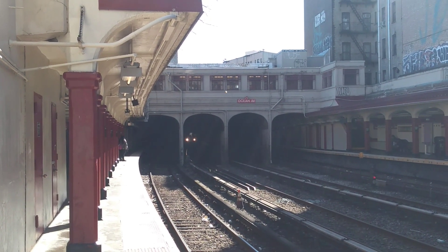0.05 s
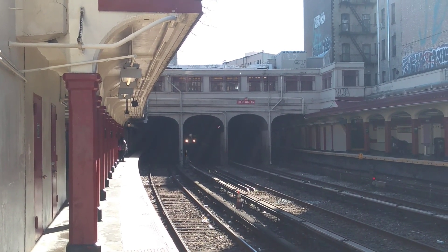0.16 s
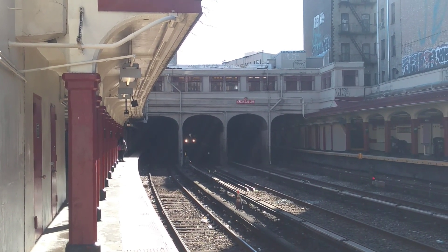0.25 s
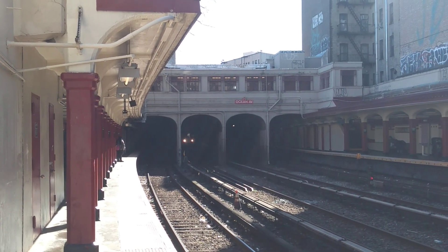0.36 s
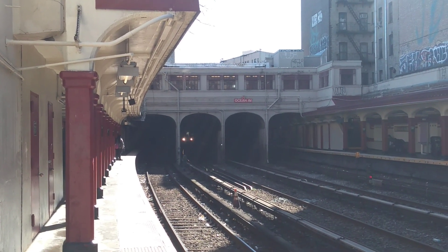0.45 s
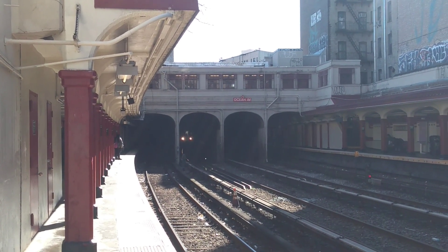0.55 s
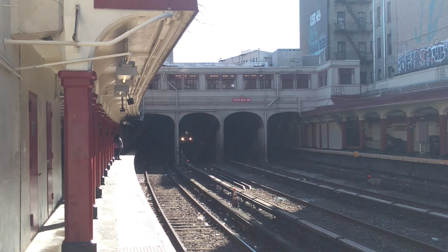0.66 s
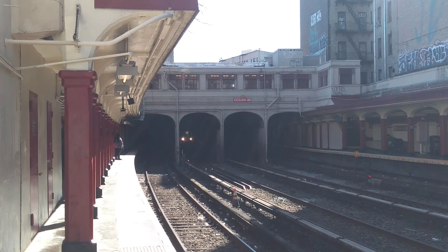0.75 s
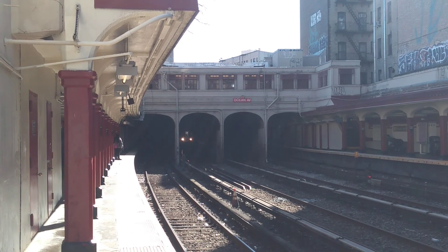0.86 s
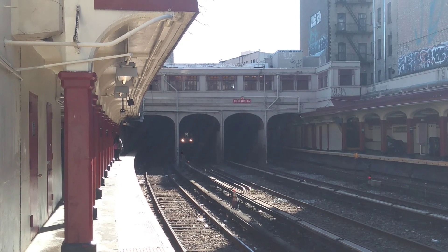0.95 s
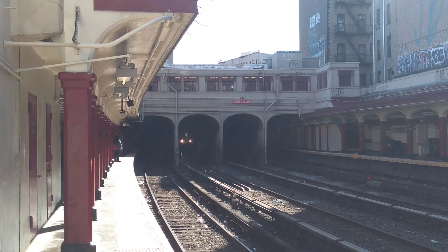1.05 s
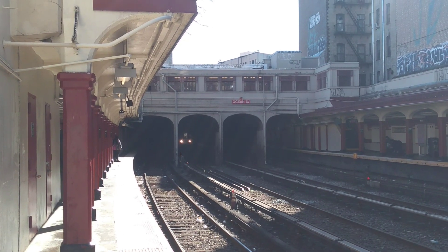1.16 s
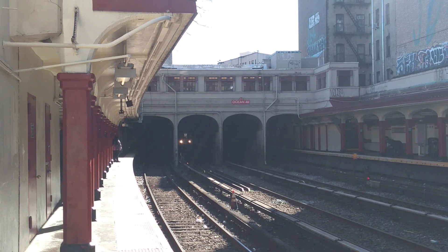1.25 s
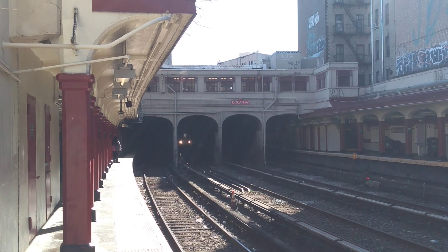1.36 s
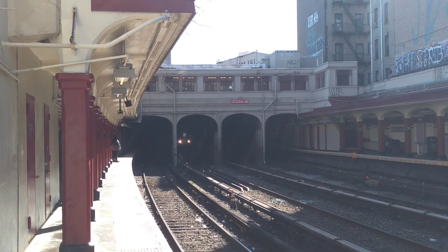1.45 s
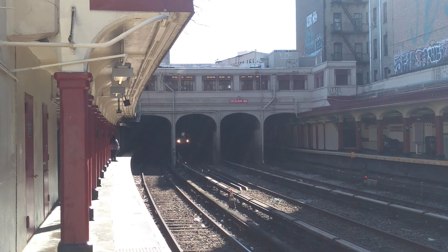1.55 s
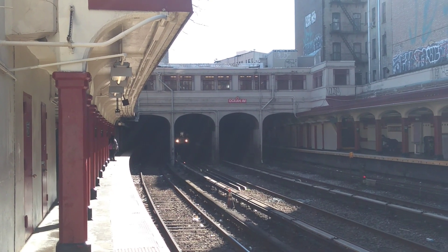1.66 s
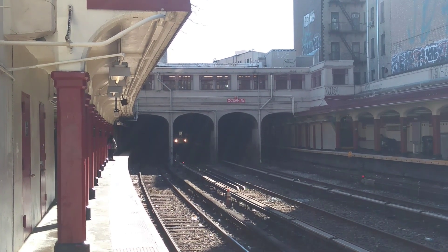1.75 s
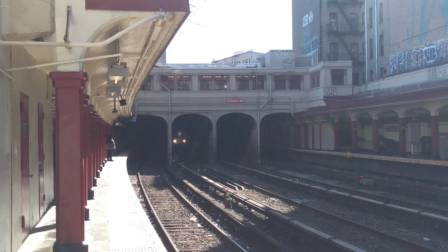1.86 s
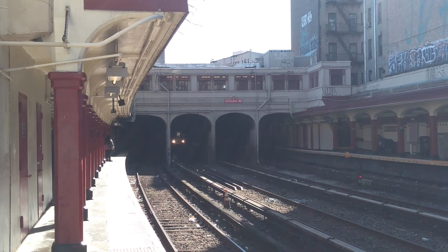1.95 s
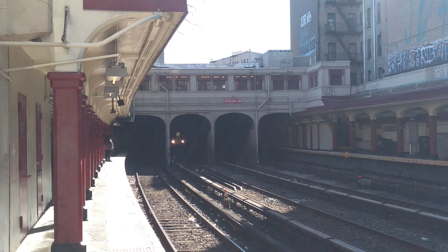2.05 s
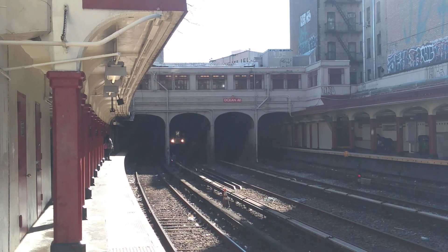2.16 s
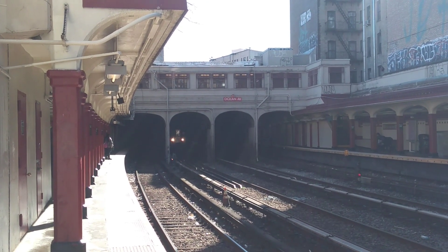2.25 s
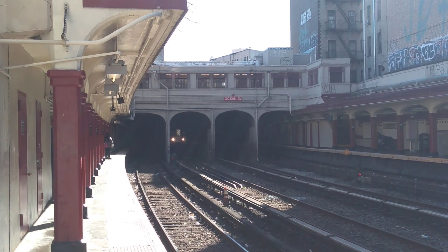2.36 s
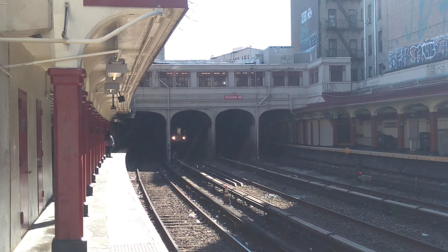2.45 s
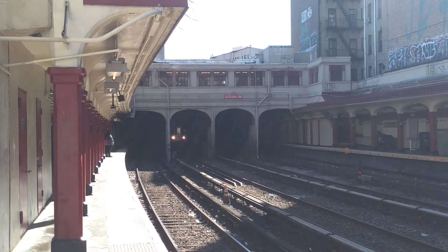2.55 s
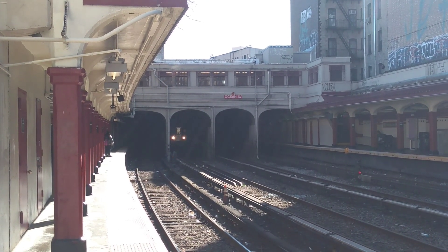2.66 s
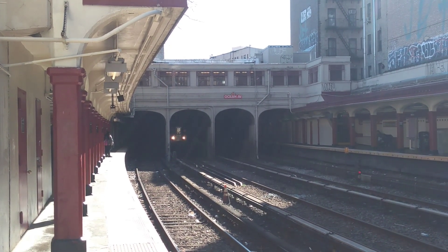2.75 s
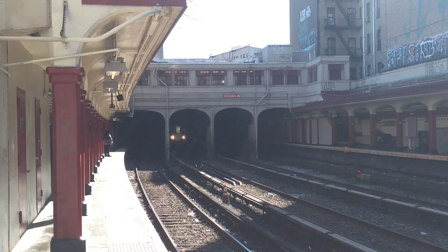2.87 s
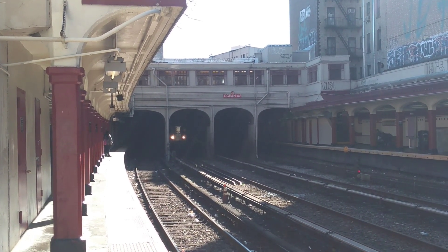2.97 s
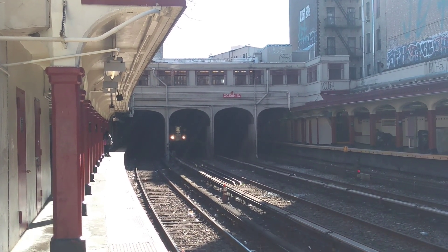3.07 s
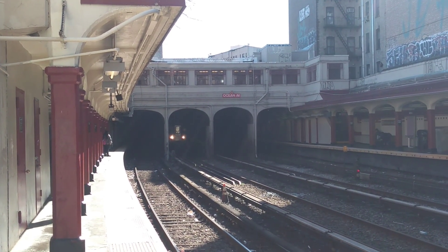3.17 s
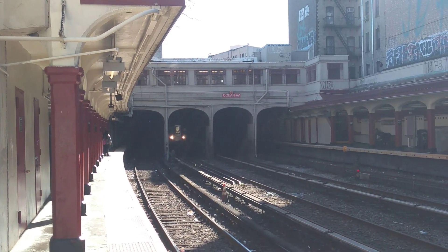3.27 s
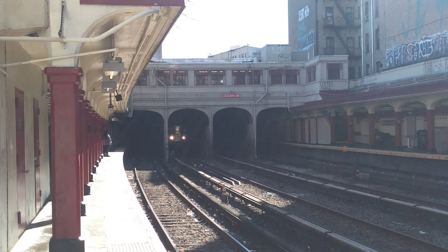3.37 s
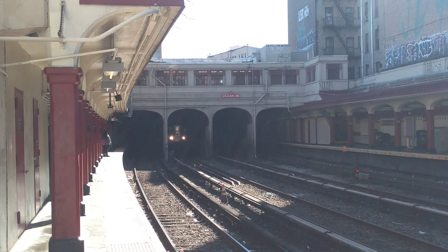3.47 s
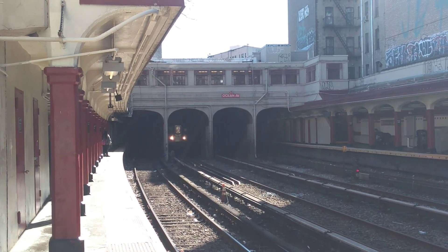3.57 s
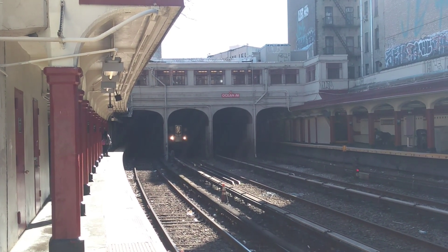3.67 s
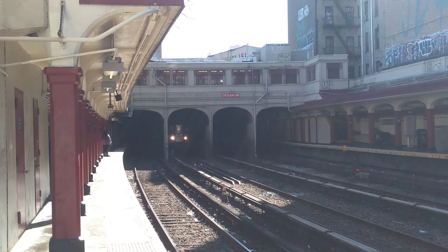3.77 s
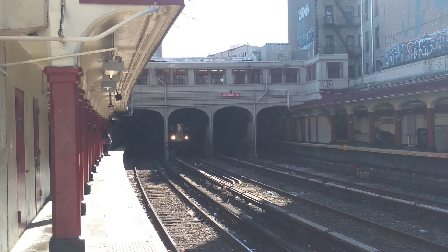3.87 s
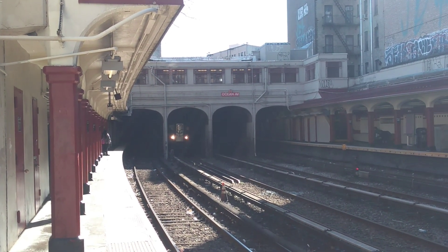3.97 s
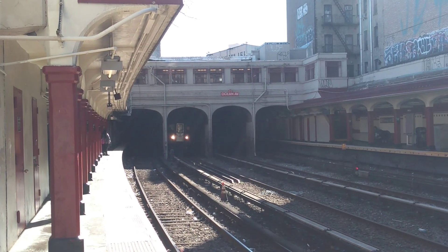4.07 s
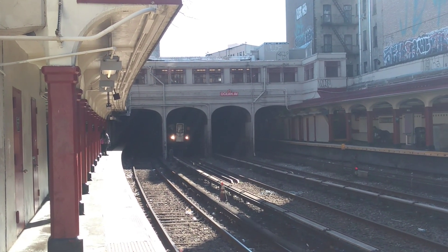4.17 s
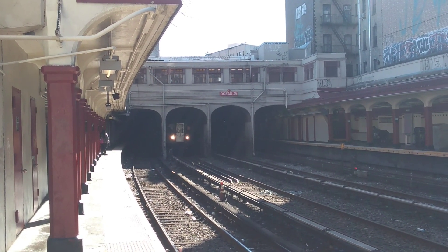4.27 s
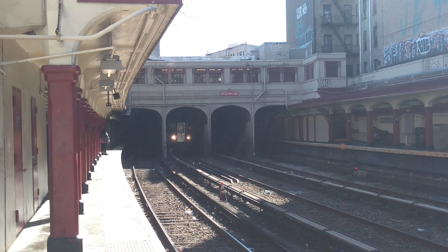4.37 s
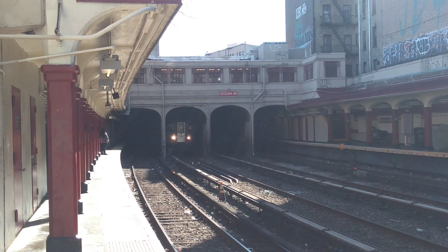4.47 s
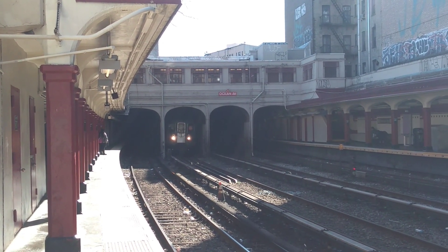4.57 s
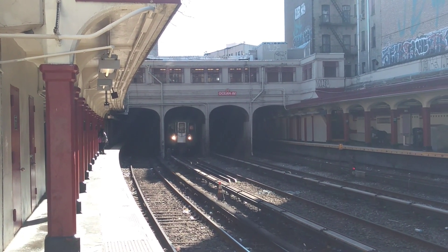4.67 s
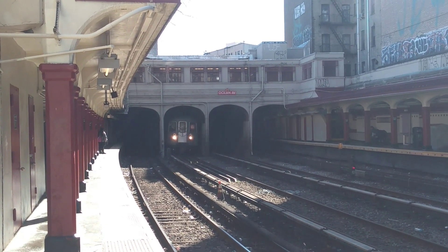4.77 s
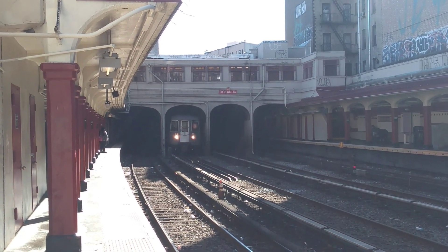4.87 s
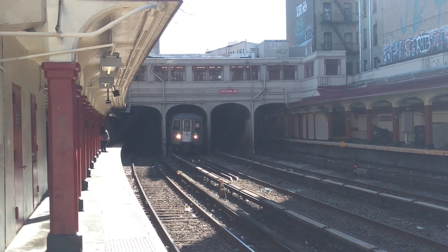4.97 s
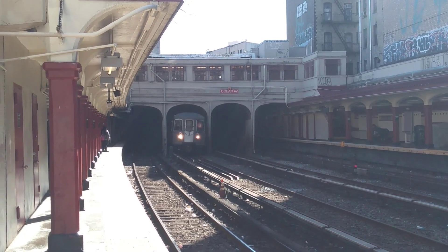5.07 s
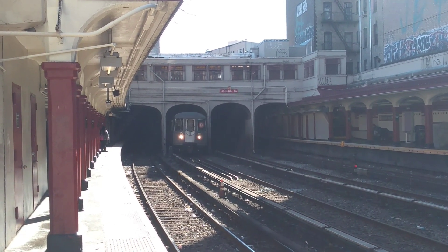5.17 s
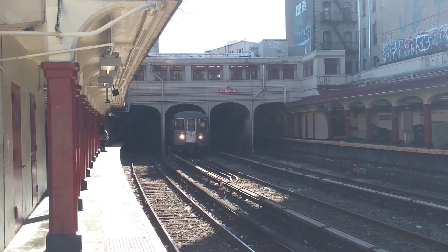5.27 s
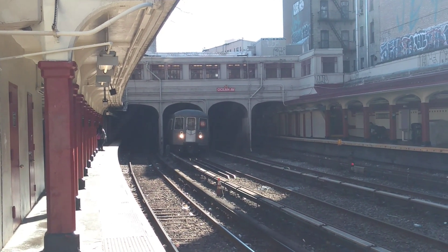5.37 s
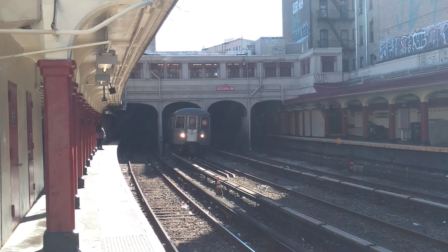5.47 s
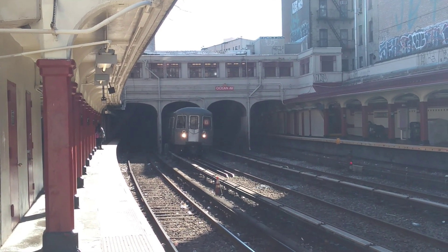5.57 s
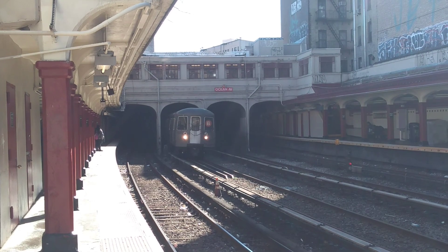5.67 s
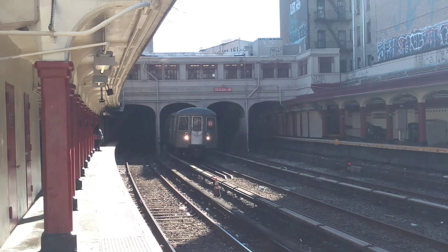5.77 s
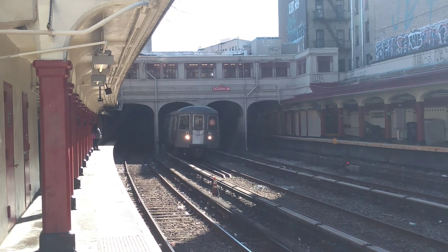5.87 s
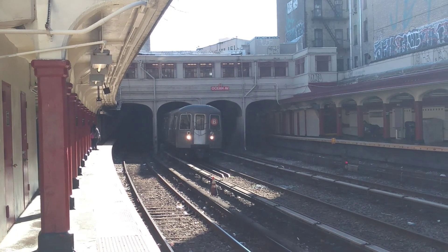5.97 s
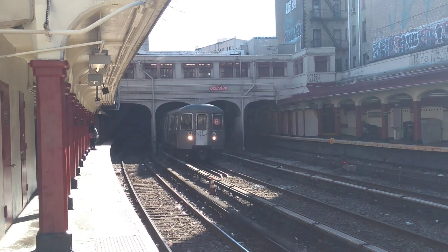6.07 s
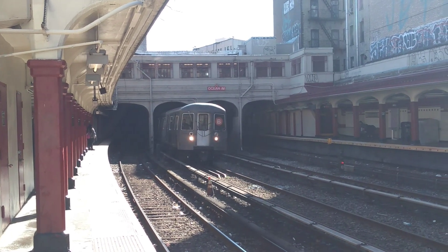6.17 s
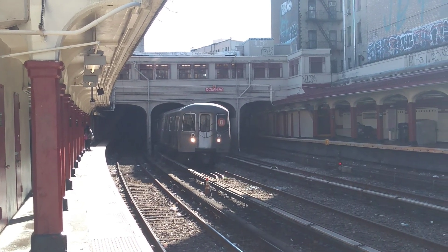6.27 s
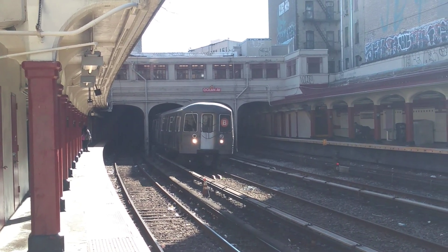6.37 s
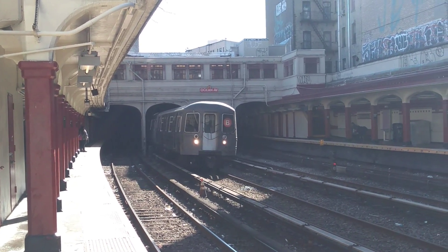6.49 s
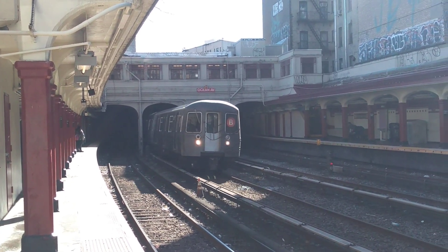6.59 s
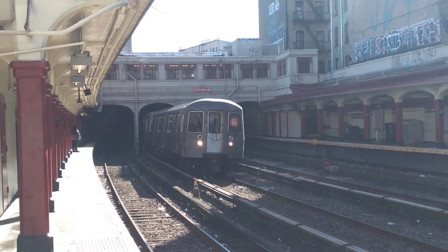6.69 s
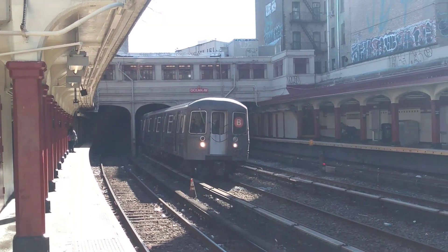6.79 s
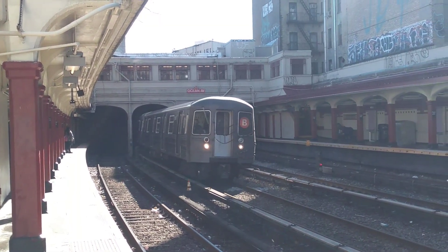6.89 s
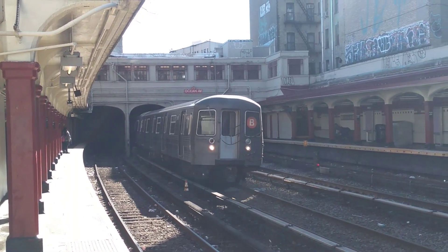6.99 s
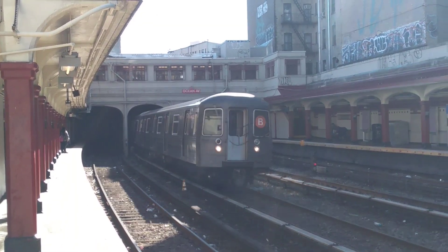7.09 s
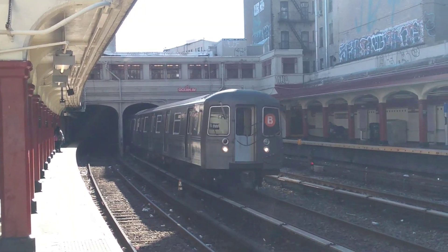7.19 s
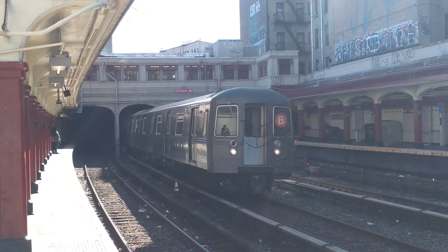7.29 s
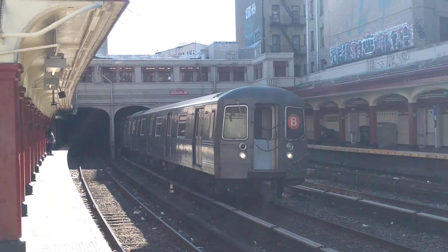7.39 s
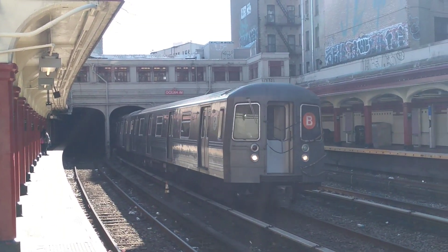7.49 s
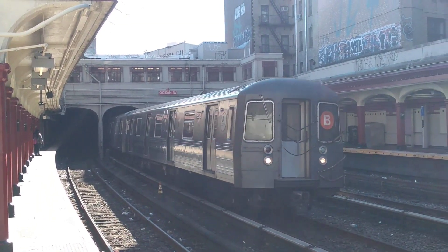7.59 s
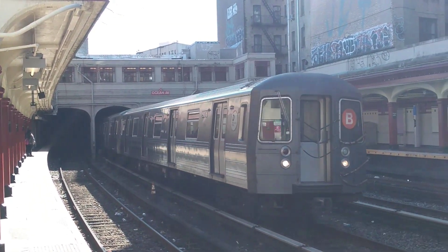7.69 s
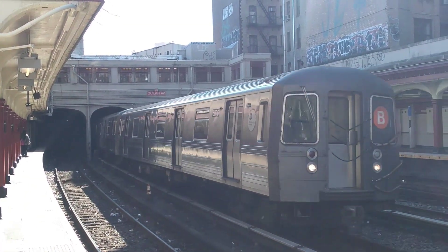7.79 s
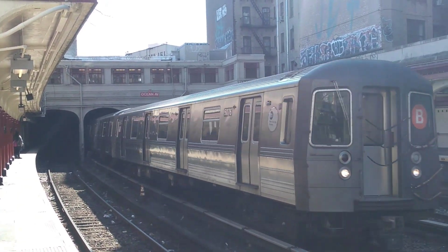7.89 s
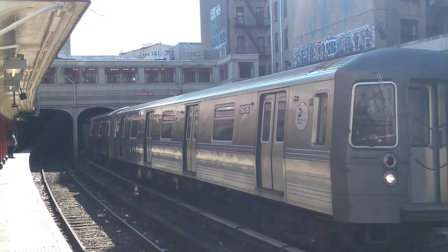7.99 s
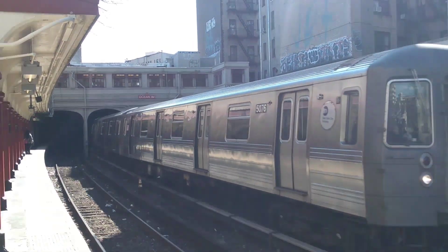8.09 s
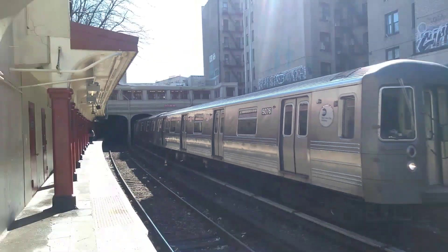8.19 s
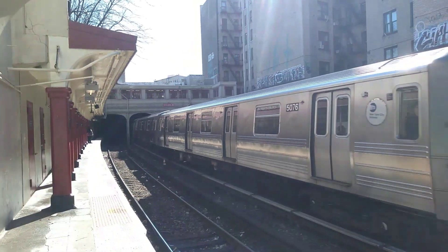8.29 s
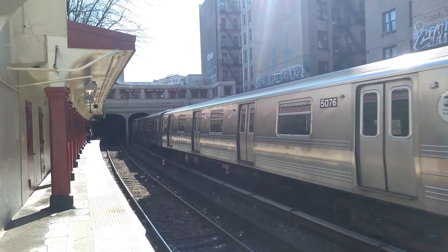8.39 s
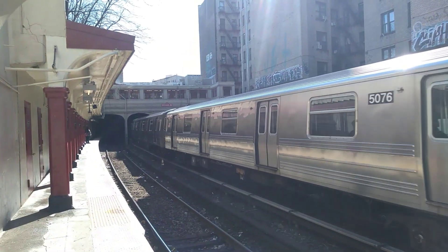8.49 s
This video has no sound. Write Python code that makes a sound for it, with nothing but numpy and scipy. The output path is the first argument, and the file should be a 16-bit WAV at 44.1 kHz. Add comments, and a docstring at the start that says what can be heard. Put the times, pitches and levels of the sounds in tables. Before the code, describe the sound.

Low wind thumps hit a handheld microphone on an open-air platform while a subway train rumbles faintly in a tunnel. The wind eases and the rumble swells unevenly, turning brighter as the train emerges. Wheels whine and ping faintly, flanges scrape, one heavy gust thumps, and the train passes close with a loud roar and hard knocks, cutting off while still rolling by.

```python
"""Wind thumps and gusts buffet the microphone at once, over the far-off rumble of a subway train in a tunnel.
The train rolls out towards an open-air platform: shaped noise grows in uneven surges as it nears,
first with the tunnel's colour, then brighter and direct. Wheels and motors sing as faint wavering tones,
knocks are short noise bursts, treads ping as fading tones, and flanges scrape as narrow hisses.
A stereo widener feeds each side into the other, turned over and late, so the bass is in opposite phase."""
import sys
import numpy as np
from scipy import signal
from scipy.fft import rfft, irfft, next_fast_len
from scipy.io import wavfile
from scipy.ndimage import uniform_filter1d, map_coordinates

SR = 44100
rng = np.random.default_rng(int(sys.argv[2]) if len(sys.argv) > 2 else 0)


def unload_wav(signal):
    """Save mono or channel-first audio to the path in sys.argv[1] as 16-bit WAV at rate SR, clipped to [-1, 1]."""
    wavfile.write(
        sys.argv[1],
        SR,
        np.round(np.clip(np.atleast_2d(signal).T, -1, 1) * 32767).astype(np.int16),
    )


N = 376613
TIME = np.arange(N) / SR  # seconds
SIZE = next_fast_len(N + 4096, real=True)  # samples, with room for the widener's delay
FREQ = np.maximum(np.arange(SIZE // 2 + 1) * SR / SIZE, 1)  # Hz

# resonances of track and wheels: pitch_hz, width_hz, tunnel_lift_db, alongside_lift_db
STEEL_RESONANCES = [(264, 104, 2, 3.5), (520, 55, 1, 2), (655, 82, 4.5, -1.5), (764.3, 136, 6.5, 5.5),
                    (993, 99, 2, 5), (1168, 145, 3, 0), (1490, 160, 3, 3.5), (1646, 65, 8, 6),
                    (2088, 280, 8, 4.5), (2805, 216, 5, 5.5), (2995, 85, 5, 5.5), (3750, 160, 2, 5),
                    (6440, 270, 2.5, 8)]
# what the second port hears and how the widener mixes: pitch_hz, own_sound_db, crossfeed_db
MICROPHONE_PORTS = [(100, -36, -1.8), (700, -35, -1.6), (1490, -16.5, -2), (3500, -5, -3),
                    (5630, -4.5, -2.5), (7400, -3.5, -6.5), (9900, -3, -19), (14000, -8, -10)]
# how the wheel roar nears: alongside_db, loss_per_doubling_db, tunnel_gain_db, deep_tunnel_loss_db
ROAR_APPROACH = (-21, 6, 2.43, 0.7)

# the train runs at a steady speed along a track to one side of the microphone
SPEED_M_PER_S, TRACK_OFFSET_M = 13.71, 8.29
ALONGSIDE_S = 8.23  # its front draws level; from then on the distance stays the same


def from_db(db):
    """Turn decibels into a gain."""
    return 10 ** (np.asarray(db) / 20)


def rms_one(x):
    """Scale a sound so that its average strength (rms) is 1."""
    return x / np.sqrt(np.mean(x ** 2) + 1e-20)


def soft_step(x):
    """Climb smoothly from 0 to 1 around x = 0."""
    return .5 + .5 * np.tanh(x / 2)


def bump(middle_s, length_s):
    """Rise and fall as a bell-shaped curve that reaches 1 in the middle."""
    return np.exp(-np.minimum(2 * ((TIME - middle_s) / length_s) ** 2, 20))


def in_frequency(rows):
    """Spread each column of a table over all frequencies, the first column being Hz."""
    hz, *columns = np.transpose(rows)
    return [np.interp(np.log(FREQ), np.log(hz), column) for column in columns]


def below(hz, order):
    """Gain of a filter that keeps what lies below hz."""
    return 1 / np.sqrt(1 + (FREQ / hz) ** (2 * order))


def above(hz, order):
    """Gain of a filter that keeps what lies above hz."""
    return 1 / np.sqrt(1 + (hz / FREQ) ** (2 * order))


def band_pass(x, low_hz, high_hz):
    """Keep one band of a sound, without ringing ahead of it."""
    return signal.sosfilt(signal.butter(2, [low_hz, high_hz], "band", fs=SR, output="sos"), x)


def drift(rate):
    """Wander smoothly at random with spread 1, through about rate new values a second."""
    knots = rng.standard_normal(2048)
    coarse_time = TIME[::32]
    curve = map_coordinates(knots, [coarse_time * rate], order=3, mode="wrap")
    return rms_one(np.interp(TIME, coarse_time, curve))


def noise(colour):
    """Make coloured noise of rms 1: separate noise at each port, the second heard mainly in the treble."""
    own_db, _ = in_frequency(MICROPHONE_PORTS)
    white = rng.standard_normal((2, len(FREQ))) + 1j * rng.standard_normal((2, len(FREQ)))
    ports = np.array([np.ones(len(FREQ)), from_db(own_db)])
    shares = ports / np.hypot(*ports)
    return rms_one(irfft(white * colour * shares, SIZE)[:, :N])


def thumps(peak_cycles=0.92, width_cycles=0.58, lead_cycles=0.22, lead_s=0.0022,
           crack_low_hz=180, crack_high_hz=520, dull_hz=720):
    """A single eddy is one firm swing of pressure, quick at first, with a dull crack at its front."""
    # single eddies that thump the microphone: start_s, swing_db, pitch_hz, crack_db (before dulling)
    eddies = [(0.026, -8.5, 121, -24.5), (0.058, -12, 100, -21), (0.084, -14, 101, -15),
              (0.3238, -4.5, 89, -14.5), (.661, -24, 94, -38), (0.899, -21, 131, -25),
              (1.155, -18, 105, -29), (1.176, -11.5, 94, -22), (1.392, -13, 115, -24),
              (1.412, -17, 105, -28), (1.434, -17, 111, -30), (1.465, -14, 102, -32), (1.71, -18, 85, -30),
              (2.128, -16.5, 112, -18), (6.670, 0.5, 107, -26), (6.714, -19, 100, -36),
              (6.748, -9, 97, -38)]
    out = np.zeros(N + SR)
    age = TIME[:SR // 10]
    crack = band_pass(signal.unit_impulse(len(age)), crack_low_hz, crack_high_hz)
    crack = crack / np.abs(crack).max()
    for start_s, swing_db, hz, crack_db in eddies:
        cycles = hz * age + lead_cycles * (1 - np.exp(-age / lead_s))
        envelope = np.exp(-((hz * age - peak_cycles) / width_cycles) ** 2)
        swing = np.sin(2 * np.pi * cycles) * envelope
        i = round(start_s * SR)
        out[i:i + len(age)] += from_db(swing_db) * swing + from_db(crack_db) * crack
    return signal.sosfilt(signal.butter(4, dull_hz, fs=SR, output="sos"), out[:N] + 1e-18)


def gusts(low_hz=62, high_hz=152, rustle_db=-28, rustle_hz=600, buffet_db=4, buffet_per_s=14):
    """Gusts and a light breeze churn at the first port: a lumpy rumble with a faint rustle on top."""
    # gusts on the microphone: middle_s, length_s, level_db (the middle is 3 dB stronger)
    gust_table = [(0.06, 0.045, -25), (0.35, 0.028, -33), (0.67, 0.022, -28), (0.915, 0.048, -39),
                  (1.195, 0.053, -31), (1.43, 0.066, -28), (1.718, 0.14, -34.5), (2.168, 0.097, -32),
                  (6.03, 0.24, -31.5), (6.36, 0.23, -27), (6.727, 0.072, -22), (7.657, 0.035, -21),
                  (8.25, 0.094, -20.5)]
    breeze_level_db, breeze_drops_s, breeze_fade_s = -37, 1.8, 0.2
    rumble = below(high_hz, order=3)
    rustle = from_db(rustle_db) * below(rustle_hz, order=3)
    churn = noise(above(low_hz, order=3) * (rumble + rustle))[0]
    churn = churn / np.sqrt(uniform_filter1d(churn ** 2, size=1000) + 1e-9)  # even out its strength
    breeze = from_db(breeze_level_db + buffet_db * drift(buffet_per_s))
    breeze = breeze * soft_step((breeze_drops_s - TIME) / breeze_fade_s)
    blows = sum(from_db(level_db) * np.sqrt(2) * bump(middle_s, length_s)
                for middle_s, length_s, level_db in gust_table)
    return churn * (breeze + blows)


def track_to_go():
    """Metres of track between the train's front and the point beside the microphone."""
    return SPEED_M_PER_S * np.maximum(ALONGSIDE_S - TIME, 0)


def approach_db(part):
    """Level of one part of the train: distance weakens it, and the tunnel favours rumble over treble."""
    mouth_m, mouth_blur_m = 47.3, 4.6  # how far off it leaves the tunnel, and how gradually
    deep_m, deep_blur_m = 90, 4.2  # beyond this the tunnel muffles it
    alongside_db, doubling_db, tunnel_db, deep_db = part
    ahead = track_to_go()
    doublings = np.log2(np.hypot(1, ahead / TRACK_OFFSET_M))
    inside = soft_step((ahead - mouth_m) / mouth_blur_m)
    deep = soft_step((ahead - deep_m) / deep_blur_m)
    return alongside_db - doubling_db * doublings + tunnel_db * inside - deep_db * deep


def surges():
    """Each part of the noise swells and lulls unevenly as the train nears (dB)."""
    # swells and lulls: middle_s, length_s, rumble_db, roar_db, ring_db, hiss_db
    surge_table = [(.2, .3, -2, -1, -1.5, 1), (.75, 0.36, 1, -0.5, -1.2, -1.5),
                   (1.234, 0.074, 1, 1, 1.6, 0), (1.45, 0.081, -2, 0.5, 2.5, 2.8),
                   (1.757, 0.079, 2, 2, 0, 1.5), (2.04, 0.068, -3, 0, -2, -2.5),
                   (2.147, 0.064, 0.5, 2, 1, 1), (2.28, .08, 0.5, -1.5, -3, 0), (2.394, 0.23, 0, 2, -1, 0),
                   (3.6, 0.39, 2.5, -0.1, -0.3, 0.5), (4.207, 0.13, .5, 0.2, 1, 0),
                   (4.442, 0.055, -3.5, 0, 1, 1), (4.6, 0.086, -1, 1.5, 1.5, .5),
                   (4.746, .12, 2, -1, -1, -1), (5.18, 0.21, 2, 0.5, -0.8, -1.7),
                   (5.58, 0.39, 1.3, 0.9, 1.1, 1.5), (5.92, 0.14, 1.2, 1, 2, 2),
                   (6.087, 0.096, 3, -0.5, 2.5, 0), (6.223, 0.091, -0.5, 0.7, -0.7, 0),
                   (6.472, 0.1, -0.5, 2.3, .5, -1), (6.757, 0.21, 0, 1.2, 0.4, -1.5),
                   (7.015, 0.2, 1.7, 2.5, 1.5, 1.2), (7.33, 0.29, -0.5, -0.2, 0.5, 0),
                   (7.706, 0.16, -3, 0.9, -1, -0.8), (8.09, 0.28, -0.5, 0.5, -0.6, -0.5),
                   (8.223, .08, 4, 0.3, 1.5, 1), (8.3, 0.094, 0, -1.5, -3, -1),
                   (8.448, .1, 0.5, 1.5, 0.2, 1.5)]
    return sum(np.outer(levels_db, bump(middle_s, length_s))
               for middle_s, length_s, *levels_db in surge_table)


def tread_grain(per_s=90, rise_s=0.0023, fading_s=0.009):
    """Pits in the treads jolt the wheels at random, each jolt quick to rise and slower to fade; spread 1."""
    load = (rng.random(N) < per_s / SR) + 1e-18
    for lag_s in (rise_s, rise_s, fading_s):
        load = signal.lfilter([1], [1, -np.exp(-1 / (lag_s * SR))], load)
    return rms_one(np.tanh(rms_one(load - load.mean()) / 2))  # pile-ups are rounded off


def rolling(rumble_waver_db=0.75, rumble_per_s=22, roar_waver_db=0.38, roar_per_s=24, ring_waver_db=0.78,
            hiss_waver_db=0.87, treble_per_s=45, grain_db=0.64, hiss_grain_db=0.16):
    """Rough wheels on rough rails drive the steel's resonances; tunnel colour gives way to direct sound."""
    # colour of the rolling noise, relative levels: pitch_hz, tunnel_db (per Hz), alongside_db (per Hz)
    rolling_colour = [(80, -7.5, -15), (104, -10, -5.5), (181, 1.5, -1), (315, -3.5, -11),
                      (382, -8.5, -8.5), (623, -10, -9), (868, -15.5, -13), (1205, -21, -26.5),
                      (1790, -25.5, -29.5), (2380, -34, -33.5), (3480, -35.5, -41), (5280, -44, -47.5),
                      (9010, -54, -52.5), (13100, -75, -65)]
    # edges between rumble, roar, ring and hiss: edge_hz
    band_edges = [85, 350, 1200, 3300, 15000]
    # how each part nears: alongside_db, loss_per_doubling_db, tunnel_gain_db, deep_tunnel_loss_db
    rumble_approach = (-15.5, 6.5, 4, 4.5)
    ring_approach = (-29, 5.5, 0, 2)  # same columns
    hiss_approach = (-40, 6, -3, 1)  # same columns
    direct_m, direct_blur_m = 21.8, 11.2

    far_db, near_db = in_frequency(rolling_colour)
    for hz, width_hz, far_lift_db, near_lift_db in STEEL_RESONANCES:
        bell = np.exp2(-np.minimum((2 * (FREQ - hz) / width_hz) ** 2, 20))
        far_db = far_db + far_lift_db * bell
        near_db = near_db + near_lift_db * bell
    far_colour, near_colour = from_db(far_db), from_db(near_db)
    near = soft_step((direct_m - track_to_go()) / direct_blur_m)
    # each part's level wavers at random, the roar least and the hiss most
    waver_db = [rumble_waver_db * drift(rumble_per_s), roar_waver_db * drift(roar_per_s),
                ring_waver_db * drift(treble_per_s), hiss_waver_db * drift(treble_per_s)]
    # one and the same jolting from the treads shakes all parts together
    uneven_db = surges() + np.outer([grain_db, grain_db, grain_db, hiss_grain_db], tread_grain())
    out = 0
    for k, part in enumerate([rumble_approach, ROAR_APPROACH, ring_approach, hiss_approach]):
        band = above(band_edges[k], order=8) * below(band_edges[k + 1], order=8)
        far_sound = np.sqrt(1 - near) * noise(band * far_colour)
        near_sound = np.sqrt(near) * noise(band * near_colour)
        out = out + (far_sound + near_sound) * from_db(approach_db(part) + waver_db[k] + uneven_db[k])
    return out


def tunnel_boom(boom_hz=55.5, width_hz=20, low_cut_hz=38):
    """The air in the tunnel mouth booms on one broad, deep resonance."""
    # how the boom nears: alongside_db, loss_per_doubling_db, tunnel_gain_db, deep_tunnel_loss_db
    boom_approach = (-31.5, 1.15, -2.5, 3.5)
    resonance = 1 / (1 + ((FREQ ** 2 - boom_hz ** 2) / (FREQ * width_hz)) ** 2)
    colour = np.sqrt(resonance) * above(low_cut_hz, order=2) * below(2 * boom_hz, order=4)
    return from_db(approach_db(boom_approach)) * noise(colour)


def air(level_db=-89, low_hz=9500):
    """A faint, steady hiss lies under everything."""
    return from_db(level_db) * noise(above(low_hz, order=3))


def pings(per_s=20, level_db=-13.5, spread_db=3.0, rise_s=0.021, ring_s=0.091, scatter=0.0316,
          centre_hz=750, tilt_db=-2.5):
    """Rough spots on the treads set low steel resonances ringing for a moment, at random times."""
    out = np.zeros(N + SR)
    age = TIME[:SR // 2]
    ring = (1 - np.exp(-age / rise_s)) * np.exp(-age / ring_s)
    roar_db = approach_db(ROAR_APPROACH)  # level_db counts from this
    pitches = [hz for hz, *_ in STEEL_RESONANCES if hz < 3400]
    chance = rng.random((1000, 3))
    spread = np.clip(rng.standard_normal((1000, 2)), -2, 2)
    for (when, which, luck), (detune, strength) in zip(chance, spread):
        if luck < per_s * TIME[-1] / len(chance):
            i = int(when * N)
            hz = pitches[int(which * len(pitches))] * (1 + scatter * detune)
            tilt = tilt_db * max(np.log2(hz / centre_hz), 0)  # weaker for each octave above the centre
            db = roar_db[i] + level_db + spread_db * strength + tilt
            out[i:i + len(age)] += from_db(db) * ring * np.sin(2 * np.pi * hz * age)
    return out[:N]


def singing(waver_per_s=40, flicker_db=2, flicker_per_s=9.4):
    """Narrow, unsteady tones of wheels and motors swell and fade while their pitch slides and wavers."""
    # thin tones: start_s, end_s, start_hz, end_hz, level_db, waver (share of the pitch)
    tones = [(.3, 2.8, 1625, 1645, -61, .004), (2.42, 2.88, 3345, 3343, -67.5, .0012),
             (2.9, 4.2, 1655, 1668, -56, .006), (4.3, 6.1, 1665, 1690, -55, .007),
             (6.8, 7.5, 2640, 2780, -53, .009), (8.0, 8.6, 2450, 2580, -50, .009),
             (5.2, 8.9, 742, 760, -45.5, .014)]
    out = np.zeros(N)
    for start_s, end_s, start_hz, end_hz, level_db, waver in tones:
        along = np.clip((TIME - start_s) / (end_s - start_s), 0, 1)
        hz = (start_hz + (end_hz - start_hz) * along) * (1 + waver * drift(waver_per_s))
        swell = np.sqrt(2 * np.abs(np.sin(np.pi * along)))
        level = from_db(level_db + flicker_db * drift(flicker_per_s))
        out += swell * level * np.sin(2 * np.pi * np.cumsum(hz) / SR)
    return out


def knocks(attack_s=0.0045, fading_s=0.019, clang_low_hz=480, clang_high_hz=1000,
           thud_low_hz=125, thud_high_hz=290):
    """Each knock is a short noise burst, a mid-pitched clang with a low thud; some are very faint."""
    # short bursts: start_s, clang_db, thud_db (both before the rise and fade)
    bursts = [(0.903, -40, -42), (1.780, -44, -44), (2.371, -33.5, -42), (5.735, -30.5, -32),
              (5.925, -38, -21), (6.488, -24.5, -32), (7.160, -27, -34), (7.585, -22, -63),
              (7.929, -17, -26), (8.014, -30, -36), (8.08, -18.5, -12), (8.181, -17.5, -11),
              (8.222, -28, -11.5), (8.427, -25, -28), (8.461, -18, -38)]
    clang = noise(above(clang_low_hz, order=3) * below(clang_high_hz, order=3))
    thud = noise(above(thud_low_hz, order=4) * below(thud_high_hz, order=3))
    out = np.zeros((2, N))
    for start_s, clang_db, thud_db in bursts:
        age = np.clip(TIME - start_s, 0, 1)
        envelope = (1 - np.exp(-age / attack_s)) * np.exp(-age / fading_s)
        out += (from_db(clang_db) * clang + from_db(thud_db) * thud) * envelope
    return out


def scrapes():
    """A wheel flange bites the rail, hisses in one band and lets go."""
    # scrapes: start_s, rise_s, fading_s, pitch_hz, width_hz, level_db (before the rise and fade)
    bites = [(5.70, 0.09, 0.2, 3300, 3000, -43), (5.85, .03, 0.11, 5750, 3800, -62),
             (6.325, .008, 0.12, 2740, 448, -40.5), (6.33, .03, 0.094, 4380, 2200, -41.5),
             (7.02, 0.06, 0.11, 2590, 400, -32), (7.025, .01, 0.043, 4500, 1500, -43),
             (8.03, .08, 0.17, 2440, 400, -31)]
    hiss = rng.standard_normal(N)
    out = np.zeros(N)
    for start_s, rise_s, fading_s, hz, width_hz, level_db in bites:
        band = rms_one(band_pass(hiss, max(hz - width_hz / 2, 500), hz + width_hz / 2))
        age = np.maximum(TIME - start_s, 0)
        envelope = (1 - np.exp(-age / rise_s)) * np.exp(-age / fading_s)
        out += from_db(level_db) * band * envelope
    return out


def scene():
    """Train and wind as the two microphone ports hear them; the first port faces the track."""
    first_port = singing() + pings() + scrapes() + gusts() + thumps()
    both_ports = rolling() + knocks() + tunnel_boom() + air()
    return both_ports + np.array([first_port, np.zeros(N)])


def record(dry, crossfeed_s=.000492, fade_s=.003, ceiling=.97, cutoff_hz=14250):
    """The widener takes from each side a late copy of the other; peaks are rounded and the top is cut."""
    _, crossfeed_db = in_frequency(MICROPHONE_PORTS)
    crossfeed = from_db(crossfeed_db) * np.exp(-2j * np.pi * FREQ * crossfeed_s)
    from_edge_s = np.minimum(TIME, TIME[-1] - TIME)
    fade = np.sin(np.pi / 2 * np.clip(from_edge_s / fade_s, 0, 1)) ** 2
    right, left = rfft(dry * fade, SIZE)  # the first port is the right one
    wide = np.array([left - crossfeed * right, right - crossfeed * left])
    sound = irfft(wide / np.hypot(1, np.abs(crossfeed)), SIZE)
    sound = sound / (1 + (sound / ceiling) ** 16) ** (1 / 16)
    return irfft(rfft(sound) * below(cutoff_hz, order=250), SIZE)[:, :N]


dry = scene()
out = record(dry)
unload_wav(out)
```